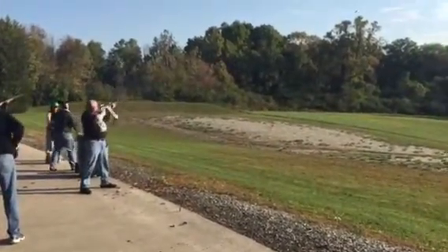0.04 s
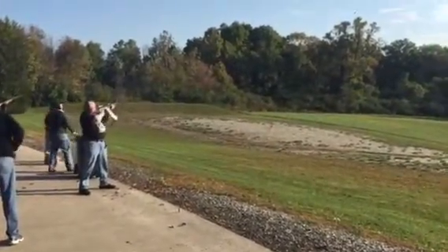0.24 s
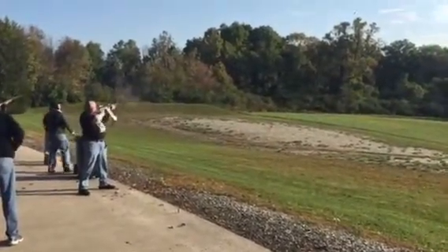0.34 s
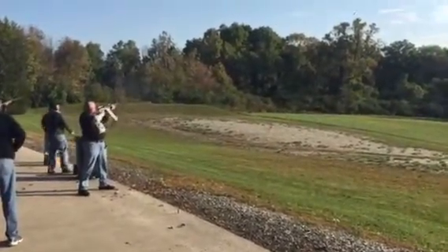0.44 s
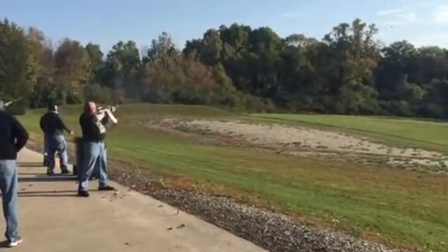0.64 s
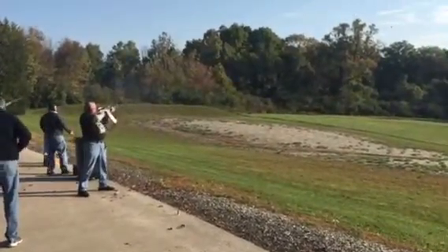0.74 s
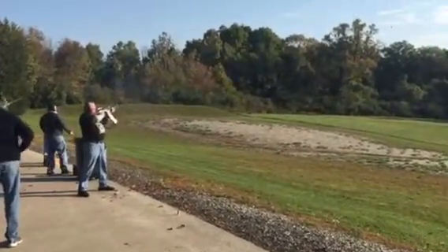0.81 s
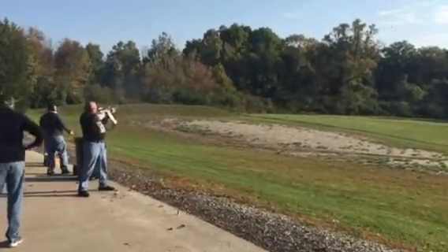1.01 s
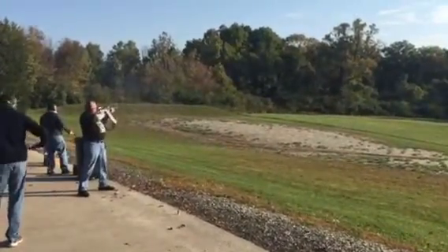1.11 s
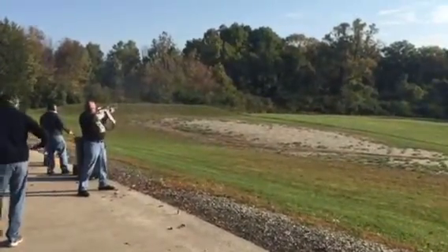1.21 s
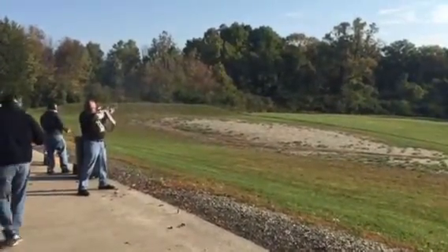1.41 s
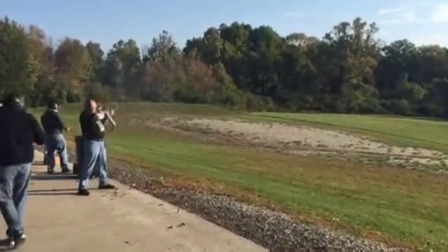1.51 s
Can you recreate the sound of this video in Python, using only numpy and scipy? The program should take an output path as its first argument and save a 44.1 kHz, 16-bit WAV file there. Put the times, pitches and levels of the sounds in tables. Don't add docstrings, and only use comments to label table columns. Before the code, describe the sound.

After a moment of faint breeze and a quick action click and knock, a shotgun fires four evenly spaced, distorted cracks on an open grass range, each with a short low thud and faint late roll from the trees.

```python
import sys
import numpy as np
from scipy import signal
from scipy.fft import rfft, irfft
from scipy.io import wavfile
from scipy.ndimage import uniform_filter1d

SR = 44100
rng = np.random.default_rng(int(sys.argv[2]) if len(sys.argv) > 2 else 0)


def ratio(d):
    e = np.asarray(d, float) / 20
    return 10 ** e


def dump(signal):
    limited = np.clip(np.atleast_2d(signal).T, -1, 1)
    pcm = np.round(limited * 32767).astype(np.int16)
    wavfile.write(sys.argv[1], SR, pcm)


N = 68355

# hz, wander_hz, level_db
CRACK_MODES = [
    (1081.6, 253.4, 1.5),
    (1604.8, 303.4, -1.5),
    (2450, 500, 0.5),
]
# delay_s, level_db
GROUND_BOUNCES = [
    (.0125, -19.5),
    (.0175, -30),
    (.026, -35.5),
]


def blast(mix, at_s, crack_db, crack_s, bounce_db, lead_db, rise_db_per_s, hiss_db):
    lead_s, hiss_s, attack_s = 0.02, 0.0027, 0.0003
    lead_hz, lead_width_hz, lead_top_hz, lead_top_db = 1000, 710, 2480, -21
    t = np.arange(2000) / SR
    low, hiss, fizz, top = rng.standard_normal((4, len(t)))

    low = resonate(low, lead_hz, lead_width_hz)
    low = evened(resonate(low, lead_hz, 2 * lead_width_hz))
    for _ in range(3):
        top = resonate(top, lead_top_hz, 2 * lead_width_hz)
    edge = signal.butter(8, 3300, fs=SR, output="sos")
    lead = signal.sosfilt(edge, low + ratio(lead_top_db) * evened(top))
    swell_db = lead_db - rise_db_per_s * abs(t - lead_s) + 0.5 * lumps(len(t), 0.0012)
    before = lead * ratio(swell_db) * (t < lead_s)
    hissing = (t > lead_s - hiss_s) * (t < lead_s)
    before += ratio(hiss_db) * evened(uniform_filter1d(hiss, size=3)) * hissing

    since = np.maximum(t - lead_s, 0)
    progress = np.minimum(since / crack_s, 1)
    sag = 1 + 0.25 * (0.5 - progress)
    body = evened(sum(ratio(db) * wander(hz * sag, spread_hz) for hz, spread_hz, db in CRACK_MODES))
    fall = ratio(crack_db - 14000 * np.maximum(since - crack_s, 0))
    crack = (body + ratio(-7.5) * fizz) * fall * np.minimum(since / attack_s, 1)
    add(mix, at_s - lead_s, before + crack)

    for delay_s, db in GROUND_BOUNCES:
        bounce = ratio(db + bounce_db) * crack * np.sin(np.pi * progress)
        add(mix, at_s - lead_s + delay_s, bounce)


def swing(mix, at_s, suction_db, suction_hz, suction_t60_s, upper_db, deep_db):
    suction = ring(suction_hz, suction_db, suction_t60_s)
    upper = ring(306, upper_db, 0.12)
    middle = ring(151, upper_db - 3, 0.066)
    deep = ring(60, deep_db, 0.027)
    add(mix, at_s, suction + upper + middle + deep)


# hz, density_db
NEAR_COLOUR = [(47, -40), (80, 2), (687, -1), (1990, -12.5), (2490, -13), (3540, -13.5), (13100, -22),
               (16000, -31)]
FIELD_COLOUR = [(24, -44.5), (40, -33), (176, -1.5), (1270, -8.5), (1680, -6.5), (4800, -14.5), (6020, -14),
                (16000, -25.5)]
FADE_COLOUR = [(24, -34), (40, -52), (194, 7), (412, 2.5), (516, 2.5), (1480, -4.5), (8990, -18),
               (16000, -36)]
TREE_COLOUR = [(24, -45), (40, -45), (91, -5), (179, -6), (280, 0.5), (509, -5), (778, -2.5), (6810, -21),
               (15500, -40.5)]
# arrival_s (after crack), rise_s, hold_s, level_db, fall_db_per_s
SCATTER_ZONES = [
    (.0, 0.002, 0.0066, -14, 576),
    (0.027, 0.017, 0.02, -27.5, 334),
    (.055, 0.019, 0.013, -34, 148),
    (0.204, 0.0069, 0.063, -40.5, 5.5),
]
# delay_s, level_db, pitch_hz
SLAP_ECHOES = [
    (.1265, -29.5, 155),
    (.148, -55, 900),
    (.195, -42, 727),
    (.2105, -36.5, 1529),
    (.262, -34.5, 630),
]


def echoes(mix, at_s, near_db, far_db, wobble):
    t = np.arange(len(wobble)) / SR
    colours = (NEAR_COLOUR, FIELD_COLOUR, FADE_COLOUR, TREE_COLOUR)
    shot_levels_db = (near_db, far_db, far_db, far_db)
    for zone, colour, shot_db in zip(SCATTER_ZONES, colours, shot_levels_db):
        arrival_s, rise_s, hold_s, db, fall_db_per_s = zone
        rise = np.clip((t - arrival_s) / rise_s, 0, 1)
        falling_s = np.maximum(t - arrival_s - rise_s - hold_s, 0)
        shape = rise * ratio(db - fall_db_per_s * falling_s)
        add(mix, at_s, ratio(shot_db + 1.5 * wobble) * shape * noise(colour, len(t)))
    for delay_s, db, hz in SLAP_ECHOES:
        add(mix, at_s + delay_s, ring(hz, db + far_db, 6.3 / hz + 0.014))


# start_s, level_db, pitch_hz, t60_s
ACTION_CLICKS = [
    (.2004, -14.5, 1690, 0.0027),
    (.2029, -18, 1520, .005),
    (.2036, -18, 6600, .003),
    (.0095, -58.5, 1930, 0.028),
    (.015, -61, 4500, .01),
    (.165, -64, 3500, .006),
    (0.5167, -25, 2230, 0.0045),
]
# start_s, level_db, pitch_hz, t60_s
BOLT_KNOCKS = [
    (0.2016, -14, 2580, .006),
    (0.202, -24, 580, .02),
    (0.2113, -26, 1150, 0.024),
    (0.21, -13, 1540, 0.01),
    (.2168, -2, 1000, 0.013),
]


def action(mix):
    for start_s, db, hz, t60_s in ACTION_CLICKS:
        roughness = 1 + 0.22 * rng.standard_normal(6000)
        add(mix, start_s, ring(hz, db, t60_s) * roughness)
    for start_s, db, hz, t60_s in BOLT_KNOCKS:
        dulled = uniform_filter1d(ring(hz, db, t60_s), size=7)
        add(mix, start_s, uniform_filter1d(dulled, size=5))
    rattle_start_s, rattle_s, rattle_db = 0.2004, 0.021, -43
    rattle = uniform_filter1d(rng.standard_normal(2000), size=2)[:round(rattle_s * SR)]
    add(mix, rattle_start_s, ratio(rattle_db) * rattle)


# hz, density_db
BREEZE_COLOUR = [(15, -55), (25, -30), (43, -30), (64, -3.5), (108, -14.5), (451, -26.5), (659, -29.5),
                 (3720, -38), (16000, -52)]


def breeze():
    breeze_db, gust_db, gust_s = -60, -1, 0.03
    return ratio(breeze_db + gust_db * lumps(N, gust_s)) * noise(BREEZE_COLOUR, N)


def evened(x):
    return x / np.sqrt(np.mean(x ** 2) + 1e-20)


def add(mix, start_s, sound):
    part = mix[round(start_s * SR):][:len(sound)]
    part += sound[:len(part)]


def noise(points, size):
    point_hz, point_db = np.transpose(points)
    hz = np.fft.rfftfreq(size, 1 / SR)
    gain = ratio(np.interp(np.log(hz + 1), np.log(point_hz + 1), point_db))
    return evened(irfft(rfft(rng.standard_normal(size)) * gain, size))


def resonate(x, hz, width_hz):
    turn = np.exp(2j * np.pi * np.cumsum(hz * np.ones(len(x))) / SR)
    r = np.exp(-np.pi * width_hz / SR)
    return 2 * (turn * signal.lfilter([1 - r], [1, -r], x / turn)).real


def ring(hz, db, t60_s):
    t = np.arange(6000) / SR
    return -ratio(db - 60 * t / t60_s) * np.sin(2 * np.pi * hz * t)


def lumps(size, width_s):
    width = max(round(width_s * SR), 2)
    smooth = uniform_filter1d(rng.standard_normal(size), width)
    return evened(uniform_filter1d(smooth, width))


def wander(hz, spread_hz):
    drifting_hz = hz + spread_hz * lumps(len(hz), 0.0008)
    return np.sin(2 * np.pi * (np.cumsum(drifting_hz) / SR + rng.random()))


# start_s, crack_db, near_db, far_db
BLASTS = [
    (0.2208, 5, 6, 2),
    (0.5378, 4, 3, -2),
    (0.8839, 3.5, 0, -1),
    (1.2495, 3, 0, -1),
]
CRACK_LENGTHS = [.0078, .0049, .0046, .0044]
# suction_db, suction_hz, suction_t60_s, upper_db, deep_db
LOW_SWINGS = [(5, 184, 0.023, -7.5, -21), (0, 240, 0.021, -11.5, -18), (-1, 170, 0.019, -16.5, -12.5),
              (2, 196, 0.021, -17.5, -11)]
# lead_db, rise_db_per_s, hiss_db
LEAD_INS = [(-10.5, 1003, -33), (-16.5, 1300, -30), (-19, 1205, -28), (-23.5, 898, -26)]


def scene():
    mix = breeze()
    wobble = lumps(N, 0.0042)
    action(mix)
    for shot, crack_s, low, lead in zip(BLASTS, CRACK_LENGTHS, LOW_SWINGS, LEAD_INS):
        at_s, crack_db, near_db, far_db = shot
        blast(mix, at_s, crack_db, crack_s, near_db, *lead)
        swing(mix, at_s + crack_s - 0.0005, *low)
        echoes(mix, at_s + crack_s, near_db, far_db, wobble)
    return mix[None]


def roll_off(x):
    return signal.sosfilt(signal.butter(12, 16990, fs=SR, output="sos"), x)


def record(dry):
    clip_db, knee = -4, 10.6
    x = signal.lfilter(*signal.butter(2, 42, "high", fs=SR), dry) / ratio(clip_db)
    x = ratio(clip_db) * x / (1 + abs(x) ** knee) ** (1 / knee)
    x = signal.lfilter(*signal.butter(1, 14, "high", fs=SR), x)
    band_limit = signal.firwin(255, 15750, window=("kaiser", 8), fs=SR)
    x = signal.oaconvolve(x, band_limit[None], "same")
    return roll_off(x)


dry = scene()
out = record(dry)
dump(out)
```